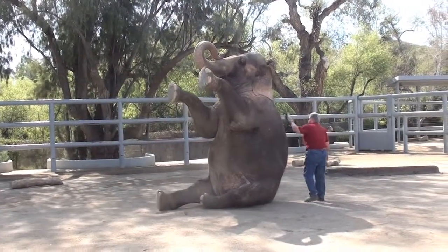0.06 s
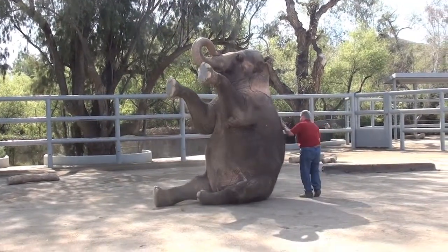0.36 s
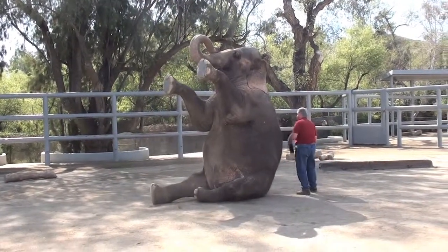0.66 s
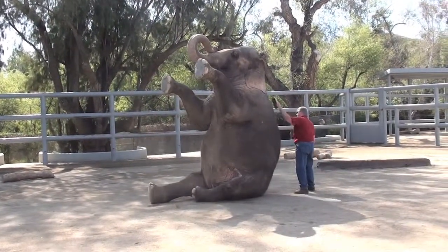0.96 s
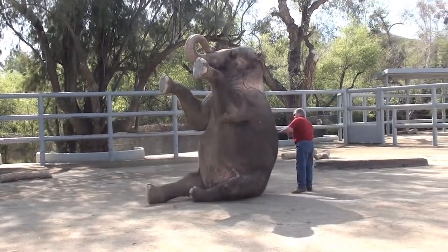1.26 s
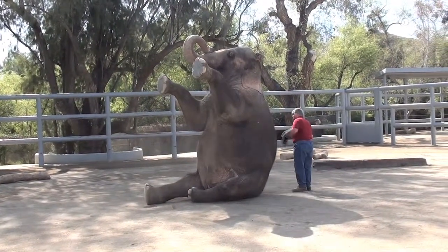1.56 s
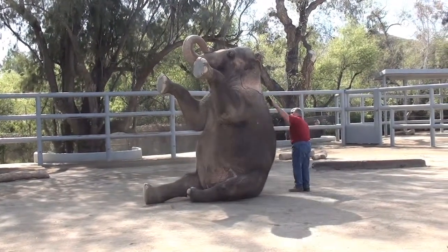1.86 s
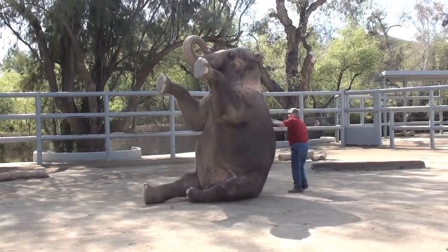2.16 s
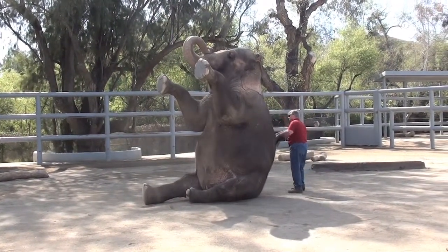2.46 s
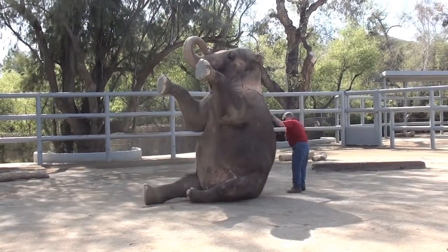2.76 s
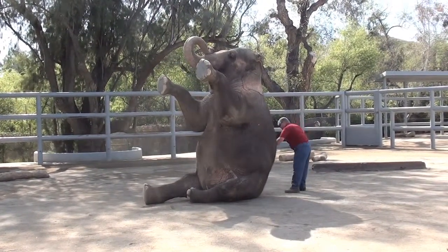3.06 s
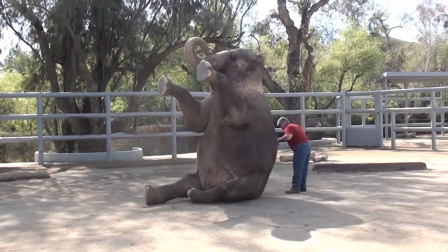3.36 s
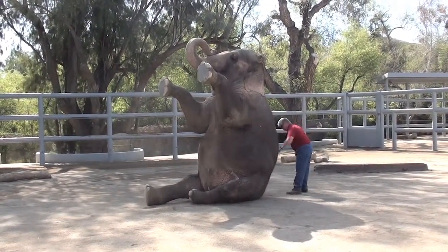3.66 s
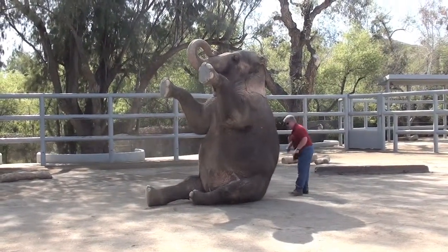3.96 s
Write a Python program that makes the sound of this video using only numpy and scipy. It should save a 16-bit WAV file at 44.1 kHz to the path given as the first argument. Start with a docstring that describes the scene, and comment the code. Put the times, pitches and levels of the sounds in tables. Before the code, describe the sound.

A stiff brush sweeps an elephant's hide five times, some metres away, at about 0.4, 1.2, 2.1, 2.9 and 3.7 seconds. Each stroke is a short, bright hiss over a duller rub, the first two strongest. Wood knocks once near 0.8 seconds, amid faint shoe scuffs on sand and ticks of grit. Small birds chirp throughout, over a distant idling engine and soft outdoor air.

```python
"""A stiff brush is swept five times down an elephant's thick hide in an open yard, some metres away.
Its bristles catch and snap free in a dense hiss, while the hide gives a duller rub.
A shoe scuffs on sand, grit ticks and something wooden knocks once. Small birds chirp in the trees,
and a distant engine idles under the soft wash of outdoor air."""
import sys
import numpy as np
from scipy import signal
from scipy.fft import rfft, irfft
from scipy.io import wavfile
from scipy.ndimage import uniform_filter1d

SR = 44100
rng = np.random.default_rng(int(sys.argv[2]) if len(sys.argv) > 2 else 0)


def generate_wav(signal):
    """Clip the signal to [-1, 1] and save it as 16-bit WAV at the path in sys.argv[1]."""
    frames = np.transpose(np.atleast_2d(signal))
    scaled = np.clip(frames, -1, 1) * 32767
    pcm = np.round(scaled).astype(np.int16)
    wavfile.write(sys.argv[1], SR, pcm)


N = 176400
T = np.arange(N) / SR

# Two calls of both near and far birds. Each row: seconds into the call, pitch in Hz, gain in dB.
CHIRRUP_SHAPE = [(0, 3700, -6), (.007, 4330, -1.5), (.026, 4330, 1), (.034, 3720, 0.5), (.052, 2930, -3),
                 (.062, 2800, -37), (.076, 3050, -6), (.084, 3670, -4.5), (.091, 3020, -5.5),
                 (.11, 2700, -12.5)]
ARCH_SHAPE = [(0, 3308, -15), (.022, 3900, -2), (.04, 4650, -1.5), (.06, 4410, -6), (.078, 3850, 0.5),
              (.1, 3366, -10), (.108, 3380, -20)]


def undb(db):
    """Turn decibels into a number to multiply by."""
    return 10 ** (np.asarray(db) / 20)


def unit(x):
    """Scale a signal so its average strength (rms) is 1."""
    return x / np.sqrt(np.mean(x ** 2))


def colour(x, points):
    """Shape the tone with a curve through points. Each point: frequency in Hz, gain in dB."""
    hz, db = np.array(points).T
    freqs = np.maximum(np.arange(N + 1) * SR / (2 * N), 1)
    gain = undb(np.interp(np.log(freqs), np.log(hz), db))
    return irfft(rfft(x, 2 * N) * gain)[..., :N]


def wander(per_s):
    """A smooth random drift of size about 1, heading for a new value per_s times a second."""
    hold = max(int(SR / per_s), 1)
    steps = np.repeat(rng.standard_normal(N // hold + 1), hold)
    return unit(uniform_filter1d(uniform_filter1d(steps, hold), hold)[:N])


def widen(mid, side, width):
    """Make stereo: both ears share mid; side, shaped by width, is added left and subtracted right."""
    return mid + np.array([[1], [-1]]) * colour(side, width)


def yard(x, echo_db):
    """Add the scattered echoes of walls, fence and trees."""
    # The echoes' tone and stereo width. Each row: frequency in Hz, gain in dB.
    tone = [(100, 9), (1000, -2), (4000, 1.5), (8000, -4), (15000, -7)]
    width = [(100, -16), (500, -13), (4000, -7.5), (7500, -5.5), (10500, -32)]
    build_s, fade_s = 0.023, 0.61
    tail = np.clip(T / build_s, 0, 1) * undb(-60 * T / fade_s)
    mid, side = colour(rng.standard_normal((2, N)) * tail / np.sqrt(np.sum(tail ** 2)), tone)
    mono = np.atleast_2d(x).mean(axis=0)
    echoes = signal.fftconvolve(mono[None], widen(mid, side, width), axes=1)[:, :N]
    return x + undb(echo_db) * echoes


def air():
    """Far traffic and leaves blend into a soft wash that swells a little."""
    # The wash's tone and stereo width. Each row: frequency in Hz, gain in dB.
    tone = [(20, -22), (38, -15), (55, -1.5), (130, 8), (200, 0), (280, -2.5), (420, -3.5), (800, -5),
            (1400, -10.5), (2400, -14), (4200, -17), (8000, -17.5), (15500, -22)]
    width = [(100, -19.5), (180, -18), (300, -10.5), (1000, -5), (4000, -5.5), (8000, -15.5), (10500, -54)]
    mid, side = unit(colour(rng.standard_normal((2, N)), tone))
    wash = widen(mid, side, width)
    level = undb(-44.5 + 0.2 * wander(1.73))
    low_flicker = colour(wash, [(800, 4), (3000, -33)]) * (undb(0.83 * wander(14)) - 1)
    return level * (wash + low_flicker)


def machines():
    """A distant engine idles, other machinery hums at its own pitches, and a deep rumble dies away."""
    # The engine's tones: one level in dB each for 2, 2.5, .. 5 times its firing rate.
    engine_db = [-48.5, -70, -52.5, -59, -53, -63, -66]
    # The other machinery's tones. Each row: pitch in Hz, level in dB.
    hum_tones = [(59.4, -57), (117.5, -54), (153, -57), (216, -64.5), (278, -61.5), (339, -62.5)]
    # How the rumble fades. Each row: time in seconds, level in dB.
    rumble_fade = [(0, -49), (.19, -43), (.33, -55), (.5, -48), (.7, -62), (1.2, -67)]
    # The rumble's tone. Each row: frequency in Hz, gain in dB.
    rumble_tone = [(20, -35), (38, -39), (55, -4), (68, -14), (140, -28), (400, -70)]

    def count_cycles(hz):
        """Cycles done so far by a machine whose speed drifts slightly."""
        return rng.random() + np.cumsum(hz * (1 + 0.00499 * wander(6))) / SR

    def drone(cycles, db):
        """One tone that wavers on its way through the air."""
        level = np.sqrt(2) * undb(db + 1.9 * wander(5.09))
        return level * np.sin(2 * np.pi * (cycles + 0.042 * wander(3.97)))

    firings = count_cycles(hz=44.85)
    engine = sum(drone(k * firings, db) for k, db in zip(np.arange(2, 5.5, 0.5), engine_db))
    hum = sum(drone(count_cycles(hz), db) for hz, db in hum_tones)
    rumble_level = undb(np.interp(T, *np.array(rumble_fade).T))
    return engine + hum + rumble_level * unit(colour(rng.standard_normal(N), rumble_tone))


def bird(shape, calls, rough):
    """A gliding whistle; the rougher it is, the more it wavers and carries a second, higher voice."""
    times, hz, db = np.array(shape).T
    length = times[-1]
    waver = 1 + rough * 0.028 * wander(600)
    flutter = unit(undb(4 * min(rough, 1) * np.tanh(wander(220))))
    song = np.zeros(N)
    for start, level_db, pitch_factor in calls:
        singing = (T >= start) & (T < start + length)
        t = T[singing] - start
        phase = 2 * np.pi * np.cumsum(pitch_factor * np.interp(t, times, hz) * waver[singing]) / SR
        soft_ends = np.clip(np.minimum(t, length - t) / 0.001, 0, 1)
        voices = np.sin(phase) + rough * undb(-10.5) * np.sin(1.12 * phase)
        song[singing] += np.sqrt(2) * soft_ends * undb(level_db + np.interp(t, times, db)) * voices
    return song * flutter


def flock(count):
    """Birds farther off chirp faintly, at random times and pitches."""
    calls = [((k + delay) * N / SR / count, -57 + 2.5 * (2 * loud - 1), 1.1 + 0.12 * (2 * high - 1))
             for k, (delay, loud, high) in enumerate(rng.random((count, 3)))]
    return bird(CHIRRUP_SHAPE, calls[::2], rough=0.87) + bird(ARCH_SHAPE, calls[1::2], rough=0.74)


def foliage(x, fade_s=0.046, smear_db=-6.5):
    """Leaves and branches smear a call over a few hundredths of a second."""
    scatter = rng.standard_normal(N) * undb(-60 * T / fade_s)
    smear = signal.fftconvolve(x, scatter / np.linalg.norm(scatter))[:N]
    return (x + undb(smear_db) * smear) / np.hypot(1, undb(smear_db))


def birds():
    """Small birds give chirps, thin twitters, raspy chips and one clean, sliding whistle."""
    # Three more kinds of call. Each row: seconds into the call, pitch in Hz, gain in dB.
    twitter_shape = [(0, 3917, 12), (.012, 4810, -0.5), (.035, 4200, 6.5), (.042, 5800, -18),
                     (.05, 5870, -1), (.075, 5970, 0), (.098, 8100, 3), (.113, 6830, 2.5),
                     (.135, 8000, -20)]
    chip_shape = [(0, 5930, 0), (.01, 5785, 3.5), (.022, 5550, -1), (.036, 5140, -8)]
    whistle_shape = [(0, 4490, -9), (.012, 4900, 0.5), (.026, 4570, -1.5), (.046, 3680, -5),
                     (.065, 3560, -13), (.11, 3716, -6), (.16, 3800, -5.5), (.2, 3614, -10),
                     (.25, 3500, -17)]
    # When each kind is sung. Each row: start in seconds, level in dB, pitch multiplier.
    chirrups = [(1.026, -38.5, 1), (1.945, -50, 1.1), (2.234, -38.5, 1), (2.965, -35.5, 1),
                (3.969, -37.5, 0.98)]
    arches = [(1.235, -29.5, 0.99), (1.9, -45.5, 0.87)]
    twitters = [(.812, -50, 0.98), (1.899, -56, 0.97), (1.942, -53, 0.95), (3.553, -49.5, 0.97)]
    chips = [(.312, -38.5, 0.71), (.365, -46, 0.59), (1.591, -43, 0.69), (1.645, -47.5, .57),
             (2.46, -42.5, 0.95), (2.504, -49.5, 0.65), (3.487, -44.5, 0.93), (3.645, -48, 0.77),
             (3.888, -44.5, 0.66), (3.935, -44.5, 0.974)]
    whistles = [(3.473, -41, 0.99)]
    chirps = bird(CHIRRUP_SHAPE, chirrups, rough=0.62) + bird(ARCH_SHAPE, arches, rough=1.17)
    chirps += bird(twitter_shape, twitters, rough=1.17) + bird(chip_shape, chips, rough=1.23)
    return foliage(chirps + flock(count=18)) + bird(whistle_shape, whistles, rough=0.13)


def snaps(tone, per_s, spread_db):
    """A crowd of tiny clicks of uneven size takes on the tone of what is struck."""
    # The clicks' stereo width. Each row: frequency in Hz, gain in dB.
    width = [(400, -19), (2500, -34), (5000, -35.5), (8000, -23), (9500, -26.5), (11000, -67)]
    clicks = (rng.random((2, N)) < per_s / SR) * rng.choice([-1, 1], (2, N))
    size = undb(spread_db * np.minimum(rng.exponential(size=(2, N)), 2 * np.pi))
    mid, side = unit(colour(clicks * size, tone))
    return widen(mid, side, width)


def shoes():
    """Soles grind over fine sand in short swells."""
    # The scuffs. Each row: start in seconds, length in seconds, level in dB.
    scuffs = [(0.22, 0.12, -36), (0.795, 0.038, -45), (1.017, 0.131, -47.5), (2.742, 0.32, -49.5)]
    # The tone of sand under a sole. Each row: frequency in Hz, gain in dB.
    sand_tone = [(150, -11), (370, -11), (600, 2), (850, -6), (1700, -6.5), (2600, -15.5), (7000, -15.5),
                 (14000, -32)]
    swell = sum(undb(db) * np.maximum(1 - (2 * (T - start) / length - 1) ** 2, 0) ** 0.68
                for start, length, db in scuffs)
    return swell * undb(1.1 * wander(110)) * snaps(sand_tone, per_s=8000, spread_db=1.3)


def ticks(decay_s=0.0017):
    """Grit and stray bristles make lone, bright clicks."""
    # The clicks. Each row: start in seconds, level in dB.
    clicks = [(.739, -32), (.961, -29.5), (0.992, -33), (1.589, -29)]
    # Their tone. Each row: frequency in Hz, gain in dB.
    tone = [(1000, -16), (4000, -6), (9000, 6), (12000, -3), (16000, -19)]
    bursts = sum(undb(db) * (T >= start) * np.exp(-np.abs(T - start) / decay_s) for start, db in clicks)
    return 0.5 * bursts * unit(colour(rng.standard_normal(N), tone))


def knock(start_s=0.7708, peak_db=-18.5):
    """Wood is struck once and its ringing dies quickly."""
    # The wood's tones. Each row: pitch in Hz, gain in dB, seconds to fade by 60 dB.
    wood_tones = [(604, -9, 0.034), (930, 6, 0.012), (1170, 3, 0.0073), (2140, -3, 0.0084),
                  (2710, -20, 0.0071)]
    t = np.maximum(T - start_s, 0)
    ring = sum(undb(db - 60 * t / fade_s) * np.sin(2 * np.pi * hz * t) for hz, db, fade_s in wood_tones)
    return -undb(peak_db) * ring / np.abs(ring).max()


def ramp(t, begin, end):
    """Rise smoothly from 0 to 1 between two times."""
    return np.sin(np.pi / 2 * np.clip((t - begin) / (end - begin), 0, 1)) ** 2


def brush():
    """Bristles catch and snap on the hide as each stroke lands, eases, presses again and flicks off."""
    # The strokes. Each row: start in seconds; seconds from there to full contact, to the eased
    # pressure and to the lift; levels in dB of the landing, the easing, the flick and the hide's rub.
    strokes = [(0.348, 0.13, .2, 0.3, -26, -33.5, -28, -44),
               (1.185, 0.088, .205, 0.29, -28.5, -33.5, -33.5, -44),
               (2.095, 0.12, 0.26, 0.301, -34.5, -37, -34, -50.5),
               (2.899, .05, 0.18, 0.34, -38.5, -41, -35, -46.5),
               (3.669, 0.045, 0.046, 0.18, -44.5, -40, -29.5, -49.5)]
    # The tones of bright bristles and dull hide. Each row: frequency in Hz, gain in dB.
    bristle_tone = [(1500, -26.5), (3000, -12.5), (4400, -8), (5700, -9.5), (6400, -7.5), (7200, 0),
                    (8600, 0), (10600, -5.5), (12500, -12), (15500, -17.5)]
    hide_tone = [(150, -13), (450, -4.5), (850, -1.5), (1400, 3), (2200, 0), (3200, -4), (6000, -13),
                 (12000, -35)]
    touch_db, lift_db_per_s, trail_db_per_s = -18, 650, 79
    hiss, rub, trail = np.zeros((3, N))
    for start, contact, eased, lift, land_db, ease_db, flick_db, rub_db in strokes:
        t = T - start
        since_lift = np.maximum(t - lift, 0)
        db = land_db + touch_db * np.maximum(1 - t / contact, 0) ** 2.06
        db += (ease_db - land_db) * ramp(t, contact, eased)
        db += (flick_db - ease_db) * ramp(t, eased, lift) ** 0.45
        db -= lift_db_per_s * since_lift
        hiss += undb(db)
        rub += undb(rub_db + 0.69 * (db - db.max()))  # follows the hiss, but more evenly
        trail += (t > lift) * undb(flick_db - 11.5 - trail_db_per_s * since_lift)
    catching = undb(0.9 * wander(170))
    bristles = hiss * snaps(bristle_tone, per_s=18000, spread_db=2)
    hide = rub * snaps(hide_tone, per_s=5000, spread_db=2.2)
    springing_back = trail * snaps(bristle_tone, per_s=1800, spread_db=3.2)
    return catching * (bristles + hide) + springing_back


def scene():
    """Brush, ground noises and birds echo in the yard, over machines and air, slightly to the right."""
    # The balance between the ears. Each row: frequency in Hz, left minus right in dB.
    balance = [(50, 0.4), (200, -1), (1000, -0.2), (8000, -.5), (11000, 0)]
    mix = yard(brush(), echo_db=-9)
    mix += yard(shoes() + ticks() + knock(), echo_db=-11)
    mix += yard(birds(), echo_db=-6.5)
    left, right = mix + machines() + air()
    return np.array([colour(left, [(hz, db / 2) for hz, db in balance]),
                     colour(right, [(hz, -db / 2) for hz, db in balance])])


def record(dry):
    """Cut off the highest treble steeply."""
    top_hz = 15750
    return signal.sosfilt(signal.ellip(10, 0.2, 80, top_hz, fs=SR, output="sos"), dry)


dry = scene()
out = record(dry)
generate_wav(out)
```